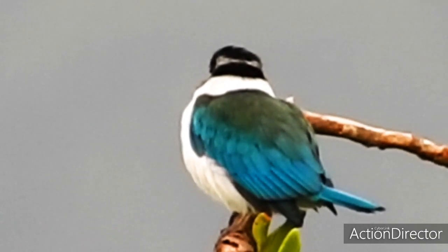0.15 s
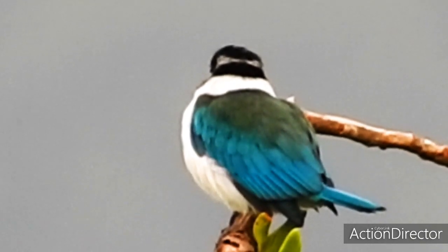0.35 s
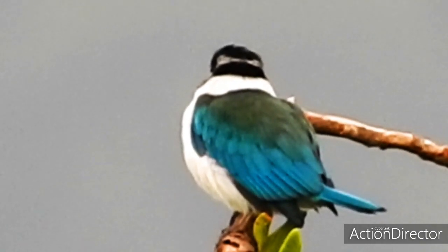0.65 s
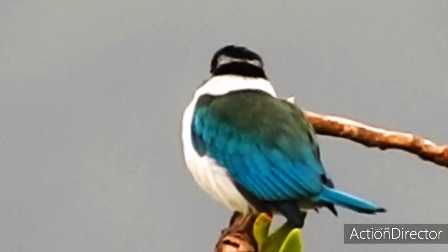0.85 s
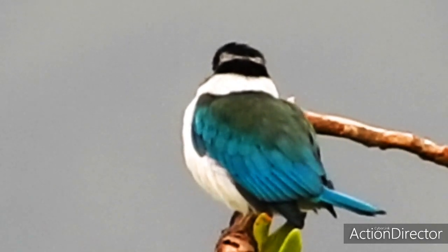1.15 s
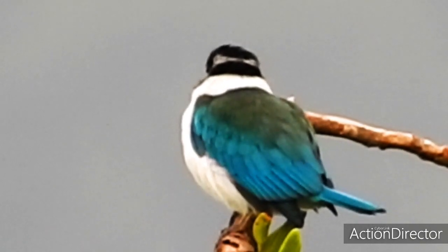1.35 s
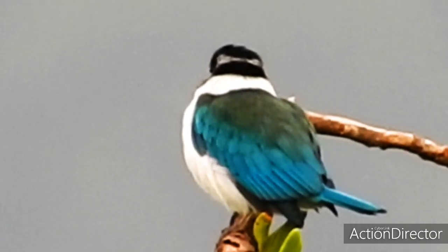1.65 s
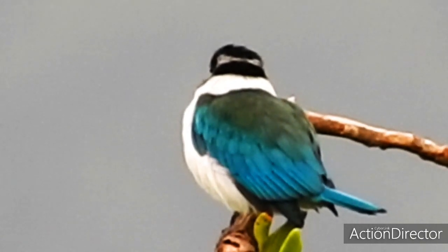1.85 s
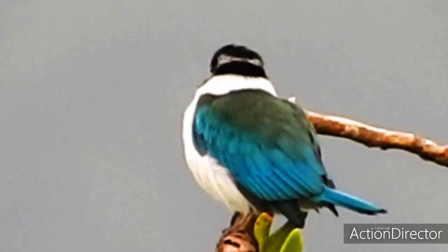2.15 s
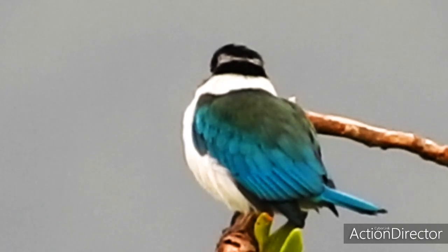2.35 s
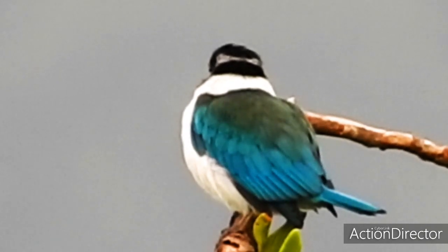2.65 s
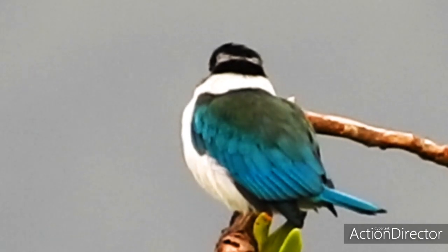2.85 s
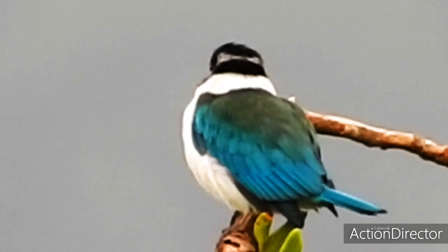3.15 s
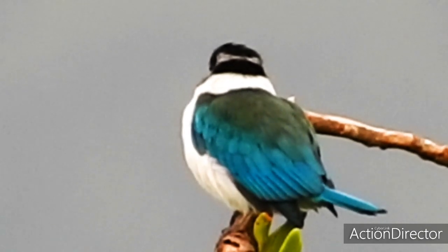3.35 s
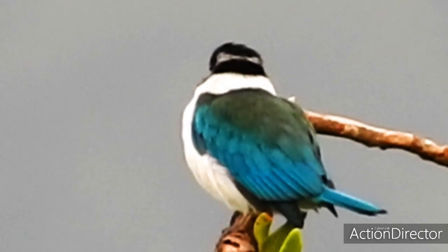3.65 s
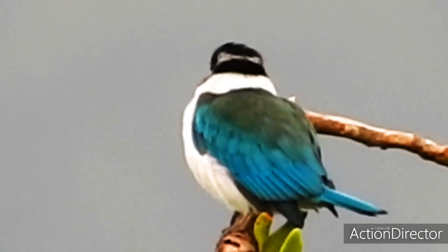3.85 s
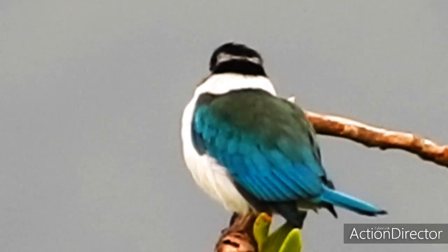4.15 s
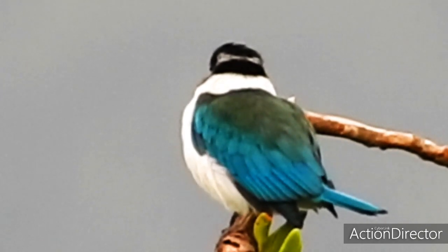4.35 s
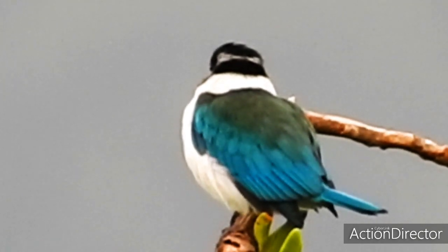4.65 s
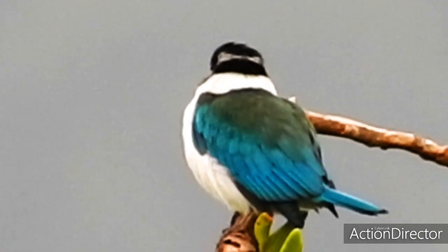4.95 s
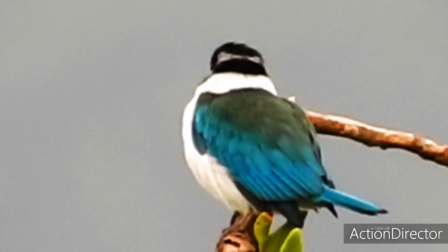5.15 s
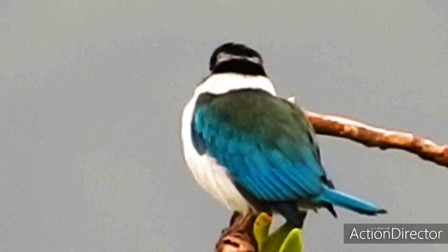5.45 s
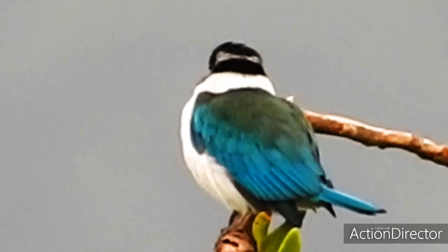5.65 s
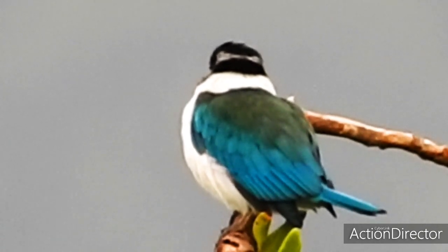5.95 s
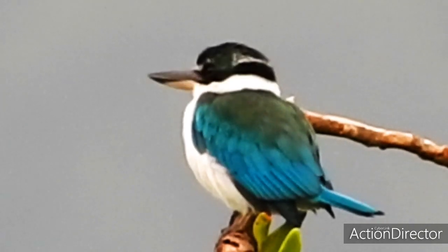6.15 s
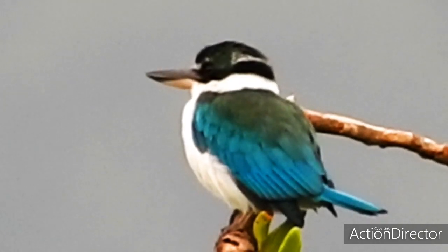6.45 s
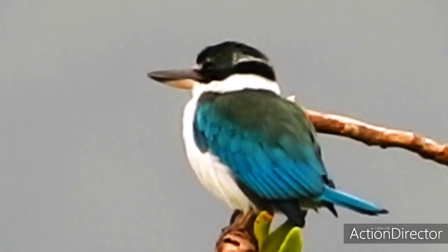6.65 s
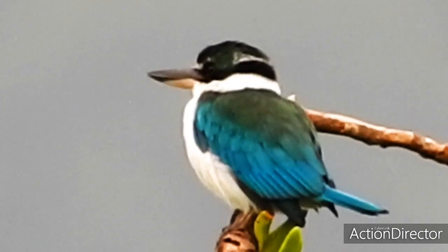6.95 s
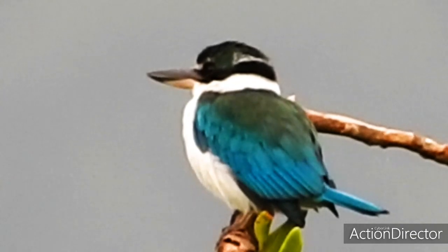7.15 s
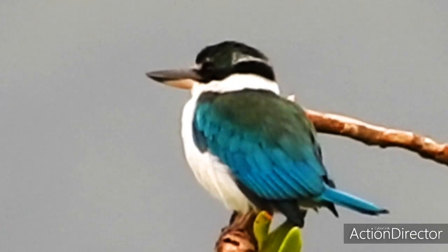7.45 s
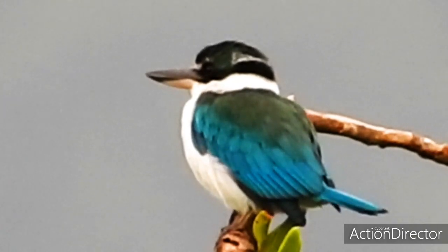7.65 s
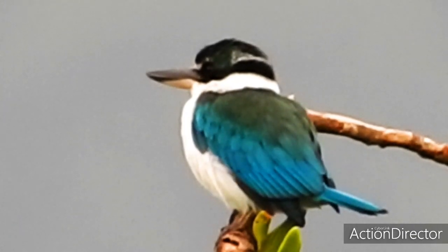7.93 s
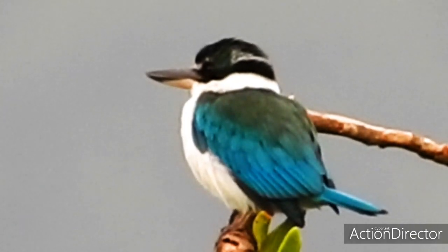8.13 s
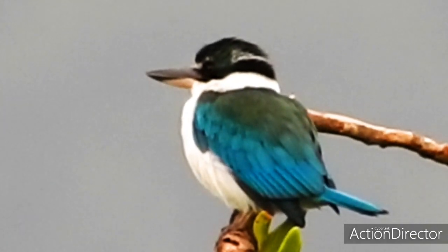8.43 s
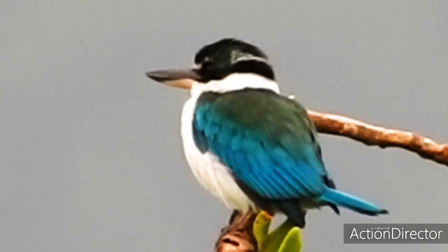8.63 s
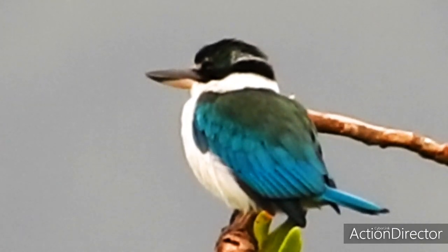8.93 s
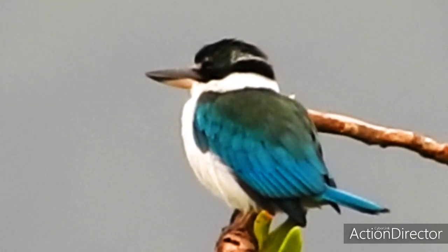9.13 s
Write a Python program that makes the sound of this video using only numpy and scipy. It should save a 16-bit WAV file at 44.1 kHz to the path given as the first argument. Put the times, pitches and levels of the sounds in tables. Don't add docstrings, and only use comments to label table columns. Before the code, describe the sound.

Sharp, scratchy paired whistles from a perched bird rattle out in fast series, stop, and resume against faint distant water and wind.

```python
import sys
import numpy as np
from scipy import signal
from scipy.io import wavfile
from scipy.ndimage import uniform_filter1d

SR = 44100
rng = np.random.default_rng(int(sys.argv[2]) if len(sys.argv) > 2 else 0)


def output_pcm(signal):
    pcm = np.clip(np.atleast_2d(signal).T, -1, 1) * 32767
    wavfile.write(sys.argv[1], SR, np.round(pcm).astype(np.int16))


def boost(x):
    u = np.asarray(x, float) / 20
    return 10 ** u


N = 409688

# first_whistle_s, wait_for_second_s, first_db, second_db, top_pitch_hz
OPENING_CALLS = [(.012, 0.049, -3.5, -6.5, 3260), (0.2634, 0.047, -6, -7.5, 3232),
                 (.416, 0.045, -5.5, -8.5, 3234), (.556, .0475, -6, -7.5, 3244),
                 (0.8289, 0.043, -6, -8, 3218), (0.9749, .045, -7, -10.5, 3250),
                 (1.265, 0.045, -5, -7.5, 3203), (1.414, 0.044, -6.5, -9.5, 3257)]
MIDDLE_CALLS = [(2.0002, .0428, -18, -10, 3310), (2.1345, .0415, -10.5, -8.5, 3386),
                (2.2687, .0447, -10, -8.5, 3330), (2.4086, .0478, -6, -7.5, 3314),
                (2.5533, .0498, -9, -9, 3328), (2.6944, .0407, -13.5, -9, 3290),
                (2.83, .0456, -10, -13, 3294), (2.983, .0444, -13.5, -6, 3265),
                (3.134, .0464, -7.5, -7, 3252), (3.295, .0488, -7.5, -7, 3308),
                (3.4467, .0439, -9, -7.5, 3275), (3.601, .0486, -9.5, -8, 3290),
                (3.7628, .0445, -9.5, -9, 3227), (4.0157, .0472, -10.5, -7, 3200),
                (4.1671, .0501, -9.5, -12.5, 3160), (4.319, .045, -11, -8.5, 3237)]
CLOSING_CALLS = [(5.7514, 0.041, -14.5, -10.5, 3380), (5.8812, 0.045, -11, -12, 3415),
                 (6.0254, .0501, -9, -12, 3416), (6.167, 0.049, -10, -10.5, 3326),
                 (6.317, 0.049, -13, -18, 3377), (6.4659, 0.047, -12, -8.5, 3360),
                 (6.606, 0.049, -9, -13.5, 3340), (6.7568, 0.049, -8.5, -11.5, 3364),
                 (7.0394, 0.045, -6.5, -7, 3326), (7.195, 0.041, -7, -7.5, 3280),
                 (7.46, 0.047, -7, -6.5, 3340), (7.61, .049, -7.5, -12, 3290),
                 (7.8625, .0451, -6.5, -8.5, 3340), (8.0081, 0.047, -8.5, -11, 3275),
                 (8.3295, 0.047, -5.5, -7, 3336), (8.471, 0.044, -8.5, -9, 3220),
                 (9.0765, .0438, -12.5, -14, 3368), (9.2215, .0462, -8.5, -11, 3324)]
# start_s, length_s, top_pitch_hz, fall_hz, level_db
LONE_STROKE = (1.913, .024, 3350, 450, -8)
WHISTLE_FALL_HZ = [(210, 310), (310, 350), (360, 500)]
WHISTLE_SWELL_DB = [(0.5, -5.5), (8.2, -3), (1.59, -3)]
LEAD_IN_DB = [(-18, -10), (-13, -6.5), (-14, -6.5)]
SECOND_WHISTLE_S = [.0185, .022, .0215]
# time_s, hiss_db, lead_in_push_db
AIR_PRESSURE = [(0, -28, 1), (.45, -26.5, 3), (.6, -29.5, -2.5), (1.5, -33, -1.5), (1.9, -30, 4.5),
                (2, -20.5, 0), (2.5, -23, -1.5), (2.75, -27, 5), (3.15, -31, -2), (3.35, -26.5, 1),
                (3.7, -27.5, -6.5), (4.1, -31, 4), (4.4, -30, 1.5), (5.7, -19, 5), (6.5, -22, 1.5),
                (7.2, -29.5, 0.5), (8, -25.5, -1), (9.3, -27, -2.5)]
# time_s, share_0_to_1
LEAF_FLUTTER = [(0, .1), (1.5, .13), (1.9, .3), (2.7, .3), (3, .2), (3.9, .22), (4.4, .32), (5.8, .3),
                (7, .24), (8.5, .18), (9.3, .2)]
# time_s, pitch_hz, level_db
CLEAN_SLIDE = [
    (8.911, 4260, -42),
    (8.917, 4240, -8),
    (8.931, 3800, -4.5),
    (8.937, 3570, -24),
    (8.953, 3450, -1),
    (8.959, 3310, -10),
    (8.973, 3442, -4),
    (8.987, 3397, -13),
    (8.995, 3256, -22),
]
# start_s, length_s, from_hz, to_hz, level_db
RISING_HOOKS = [
    (6.813, 0.015, 3380, 3510, -19),
    (7.507, 0.027, 3350, 3604, -18),
    (9.135, 0.013, 3470, 3600, -22.5),
    (9.275, 0.016, 3340, 3560, -20.5),
]
# time_s, left_right_db, left_lead_radians, overtones_db
HEAD_BEARING = [(0, 3.5, -0.12, -6), (1.5, 0.5, -0.26, -2), (1.9, 0, -0.89, 2), (2.951, 0.5, -0.98, -1),
                (3.05, 0, 1.5, -1), (3.6, -0.5, 1.03, -2.5), (4.401, 0.5, 1.05, -3),
                (5.702, -0.7, -0.67, 10), (6.4, 0, -0.13, 1), (6.999, 0, 0.66, -1), (7.7, 0.2, 0.45, -0.5),
                (8.6, 0, -0.13, 0), (8.9, 1, 0.025, -0.5), (9.3, 0, -.3, 0.5)]
# frequency_hz, level_db
THROAT_RESONANCE = [(1500, -38), (2200, -13), (2800, -1), (3400, 3.5), (4200, -1), (5200, -17.5),
                    (6500, -17.5), (8000, -18.5), (9800, -10.5), (13000, -20.5)]
# frequency_hz, level_db_per_hz
BEAK_AIR = [(1200, -50), (1900, -24), (2400, -14), (3300, -16), (4400, -14), (5300, -19), (6400, -16),
            (7800, -28), (9700, -19), (11200, -25), (12900, -21), (13300, -25)]
# frequency_hz, level_db_per_hz
BACKGROUND_SPECTRUM = [(25, -28), (50, -23), (84, 2.5), (125, -9), (190, -1), (300, -6.5),
                       (650, -6.5), (850, -10.5), (1700, -11), (3700, -14.5), (6500, -7), (7800, -17.5),
                (9500, -27.5), (13200, -35)]
# time_s, level_db
WASH_SWELL = [(0, -37.5), (2, -37.5), (2.3, -37.5), (5.6, -37.5), (6.3, -38), (7, -33.5), (9.29, -34.5)]
# frequency_hz, likeness_0_to_1
STEREO_LIKENESS = [(60, 0.97), (130, 1), (280, 0.99), (600, 0.94), (1280, 0.83), (2760, 0.69),
                   (5940, 0.043), (12800, 0.067)]

LEAD_IN_HZ = (1882, 1718)
STEP_DOWN_HZ = 60
FIRST_SHARE = .505
SPENT_DB = -2.5
UNEVEN_FALL = .12
WASH_DB = -27
TOP_EDGE_HZ = 13330


def evened(x):
    return x / np.sqrt(np.mean(abs(x) ** 2) + 1e-20)


def read_spectrum(points, hz):
    f, value = np.transpose(points)
    return np.interp(np.log(hz + 1), np.log(f + 1), value)


def read_over_time(table, s):
    times, *columns = np.transpose(table)
    return [np.interp(s, times, column) for column in columns]


def wander(hz):
    z = rng.standard_normal((2, N)) + 1j * rng.standard_normal((2, N))
    return evened(signal.sosfilt(signal.butter(2, hz, fs=SR, output="sos"), z))


def noise(spectrum, likeness, patchy_db, size, extra_db=0):
    frames, hz = 4 * N // size + 5, np.fft.rfftfreq(size, 1 / SR)
    a, b, c, d, patches = rng.standard_normal((frames, len(hz), 5)).T
    patches = uniform_filter1d(patches, size=size // 64, axis=0)
    patches = evened(uniform_filter1d(patches, size=8, axis=1))
    same = np.clip(read_spectrum(likeness, hz), -1, 1)[:, None]
    left = a + 1j * b
    right = same * left + np.sqrt(1 - same ** 2) * (c + 1j * d)
    level_db = read_spectrum(spectrum, hz)[:, None] + patchy_db * patches + extra_db
    z = np.array([left, right]) * boost(level_db)
    return evened(signal.istft(z, nperseg=size, noverlap=3 * size // 4)[1][:, :N])


def kingfisher():
    hz, level_db, hiss_db, flutter = gestures()
    pan_db, lead, bright_db = read_over_time(HEAD_BEARING, np.arange(N) / SR)
    side = np.array([[.5], [-.5]])
    shaken_hz = hz * (1 + 0.0303 * flutter * wander(286)[0].real)
    phase = 2 * np.pi * np.cumsum(shaken_hz) / SR
    overtones_db = []
    for k in range(1, 7):
        brightness_db = bright_db * np.clip(k * hz / 2000 - 2.3, 0, 1)
        overtones_db.append(read_spectrum(THROAT_RESONANCE, k * hz) - 2.1 * k + brightness_db)
    heights = boost(overtones_db)
    heights /= np.sqrt((heights ** 2).sum(0) / 2)
    spin = np.exp(1j * (phase + side * lead))
    tone = boost(level_db) * sum(h * spin ** k for k, h in enumerate(heights, 1))
    slack = np.clip((2700 - hz) / 700, 0, .5)
    tone *= np.sqrt(1 - slack ** 2) + slack * wander(330)[0]
    scatter = np.clip(1.65 * flutter, 0, .9)
    scattering = np.sqrt(1 - scatter ** 2) + scatter * wander(163)
    voiced = ((tone + rising_hooks()) * scattering).real
    puffs = .25 + .85 * abs(wander(300)[0])
    rush = noise(BEAK_AIR, STEREO_LIKENESS, patchy_db=4.0, size=512) * puffs * boost(hiss_db + 5.5)
    return (voiced + rush) * boost(side * pan_db)


def strokes():
    rows = [(*LONE_STROKE, 0, LEAD_IN_HZ[0], LEAD_IN_DB[1][0], 0)]
    bouts = (OPENING_CALLS, MIDDLE_CALLS, CLOSING_CALLS)
    manners = zip(bouts, WHISTLE_FALL_HZ, WHISTLE_SWELL_DB, LEAD_IN_DB, SECOND_WHISTLE_S)
    for calls, fall_hz, swell, lead, second_s in manners:
        falls = np.array(fall_hz) * (1 + UNEVEN_FALL * rng.standard_normal((len(calls), 2)))
        for (s, wait, first_db, second_db, top), fall in zip(calls, falls):
            rows.append((s, FIRST_SHARE * wait, top + STEP_DOWN_HZ / 2, fall[0], first_db,
                         swell[0], LEAD_IN_HZ[0], lead[0], 0))
            rows.append((s + wait, second_s, top - STEP_DOWN_HZ / 2, fall[1], second_db,
                         swell[1], LEAD_IN_HZ[1], lead[1], SPENT_DB))
    return sorted(rows)


def gestures(lead_s=.0145, leap_s=.007, scratch=0.5, shut_db=-60):
    knots, last_end, last_db = [], -.1, shut_db
    for s, length, top, fall, db, swell_db, low, lead_db, spent_db in strokes():
        end, early_db, late_db = top - fall, db - swell_db / 2, db + swell_db / 2
        hiss_db, push_db = read_over_time(AIR_PRESSURE, s)
        hiss_db, lead_db = hiss_db + spent_db, lead_db + push_db
        flutter = read_over_time(LEAF_FLUTTER, s)[0]
        gap = s - last_end
        if gap < .04:
            knots += [(last_end + .2 * gap, .7 * end + 300, last_db - 20, hiss_db, flutter),
                      (last_end + .36 * gap, 1.08 * low, lead_db - 6, hiss_db, flutter),
                      (last_end + .52 * gap, low, lead_db, hiss_db, flutter),
                      (last_end + .7 * gap, 1.07 * low, lead_db - 6, hiss_db, flutter)]
        else:
            climb_s = lead_s if gap < 1 else 0.893 * leap_s
            opening_s = s - climb_s - .012 * (gap < 1) - .001
            knots += [(last_end + .016, 2200, shut_db, shut_db, scratch),
                      (opening_s, .75 * low, shut_db, shut_db, scratch),
                      (s - climb_s, .9 * low, lead_db - 8, hiss_db - 5, scratch),
                      (s - leap_s, 1.1 * low, lead_db + 1.5, hiss_db, scratch)]
        knots += [(s - .45 * leap_s, .83 * top, early_db - 20, hiss_db, flutter),
                  (s, .962 * top, early_db - .6, hiss_db, flutter),
                  (s + .25 * length, .97 * top + .03 * end, early_db, hiss_db, flutter),
                  (s + .75 * length, .45 * top + .55 * end, late_db, hiss_db, flutter),
                  (s + length, end, late_db - 2.0, hiss_db - 1.0, flutter),
                  (s + length + .003, .92 * end, late_db - 17, hiss_db - 4, flutter)]
        last_end, last_db = s + length, late_db
    knots += [(s, hz, db, db - 21.0, .07) for s, hz, db in CLEAN_SLIDE]
    for k, away_s in ((0, -.004), (-1, .008)):
        knots.append((CLEAN_SLIDE[k][0] + away_s, CLEAN_SLIDE[k][1], shut_db, shut_db, scratch))
    tracks = read_over_time(sorted(knots), np.arange(N) / SR)
    return [uniform_filter1d(track, size=60) for track in tracks]


def rising_hooks():
    out = np.zeros(N + SR, complex)
    for s, length, from_hz, to_hz, db in RISING_HOOKS:
        hz = np.linspace(from_hz, to_hz, round(length * SR))
        glide = np.exp(2j * np.pi * np.cumsum(hz) / SR) * signal.windows.tukey(len(hz), .4)
        out[round(s * SR):][:len(hz)] += boost(db + 7.5) * glide
    return out[:N]


def trees(x, t60, gap_s, top_hz):
    slots = np.arange(0, SR // 2, 24)
    at = slots + rng.integers(0, 24, (2, len(slots)))
    taps = np.zeros((2, SR // 2 + 24))
    bounces = rng.choice([-1., 1.], at.shape) * rng.exponential(1, at.shape)
    np.put_along_axis(taps, at, bounces, 1)
    t = np.arange(taps.shape[1]) / SR
    taps *= boost(-60 * t / t60) * np.clip(t / gap_s, 0, 1)
    dull = signal.sosfilt(signal.butter(1, top_hz, fs=SR, output="sos"), x)
    return signal.oaconvolve(dull, taps / np.linalg.norm(taps[0]), axes=1)[:, :N]


def wash():
    t = np.arange(N // 512 + 5) * 512 / SR
    hz = np.fft.rfftfreq(2048, 1 / SR)[:, None]
    middle = np.exp(-np.log(hz / 1300 + 1e-9) ** 2 / 0.24)
    swell_db = (read_over_time(WASH_SWELL, t)[0] + 38.0) * middle
    gusts_db = 3 * np.cos(2 * np.pi * 2.02 * (t - 4.95)) * np.clip((hz - 8500) / 2000, 0, 1)
    hiss = noise(BACKGROUND_SPECTRUM, STEREO_LIKENESS, patchy_db=1.55, size=2048,
                 extra_db=swell_db + gusts_db)
    return boost(WASH_DB) * hiss


def scene():
    bird = kingfisher()
    near_echo = boost(-5.5) * trees(bird, t60=0.24, gap_s=0.0015, top_hz=15800)
    far_echo = boost(-16.0) * trees(bird, t60=0.77, gap_s=0.11, top_hz=4400)
    return bird + near_echo + far_echo + wash()


def thinned(x, contrast=.4, holes=.9, hole_db=-45):
    hz, t, z = signal.stft(x, SR, nperseg=1024, noverlap=768)
    size, hz = abs(z).mean(0) + 1e-9, hz[:, None]
    prominence = np.clip(size / uniform_filter1d(size, size=7, axis=0), 0, 1.6)
    gain = prominence ** (contrast * (hz > 330))
    strips = uniform_filter1d(rng.standard_normal(size.shape), size=11, axis=0)
    strips = evened(uniform_filter1d(strips, size=16, axis=1))
    valleys = .5 * np.cos(2 * np.pi * (hz - 8000) / 3000)
    quiet = (size.max(0) < .02) * (hz < 9500)
    depth = np.clip(6 * (strips + valleys - holes - quiet), 0, 1)
    gain *= boost(hole_db * depth * (hz > 7300))
    return signal.istft(z * gain, SR, nperseg=1024, noverlap=768)[1][:, :N]


def band_limit(x):
    return signal.sosfilt(signal.butter(12, 13380, fs=SR, output="sos"), x)


def record(dry):
    rounded = dry / (1 + abs(dry / .9) ** 4) ** .25
    top_edge = signal.firwin(511, TOP_EDGE_HZ, window=("kaiser", 9), fs=SR)
    mix = signal.oaconvolve(thinned(rounded), top_edge[None], "same")
    return band_limit(np.clip(mix, -1, 1))


dry = scene()
out = record(dry)
output_pcm(out)
```